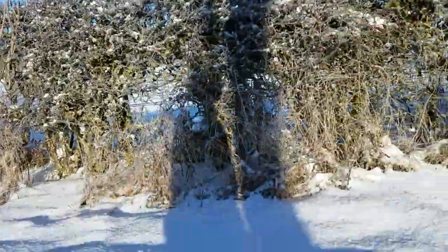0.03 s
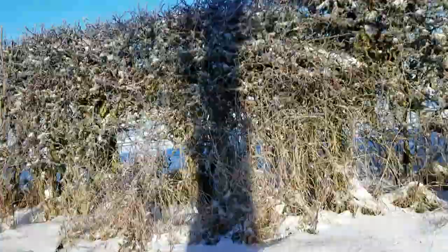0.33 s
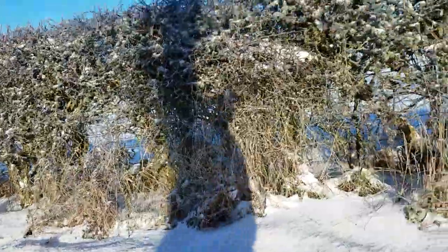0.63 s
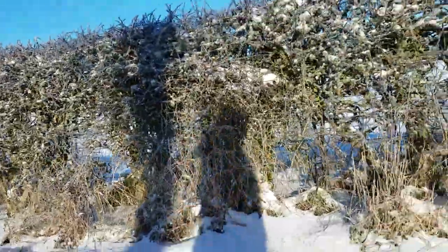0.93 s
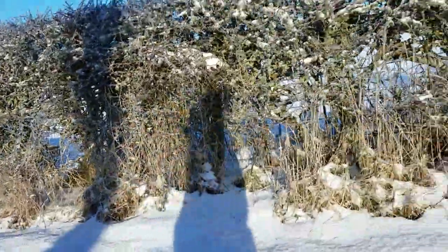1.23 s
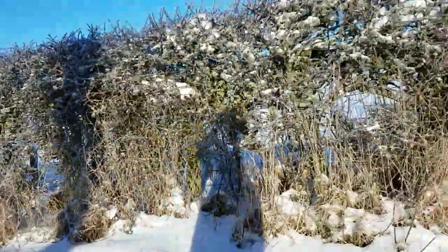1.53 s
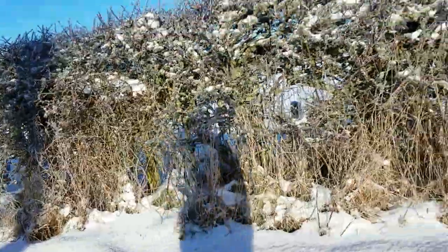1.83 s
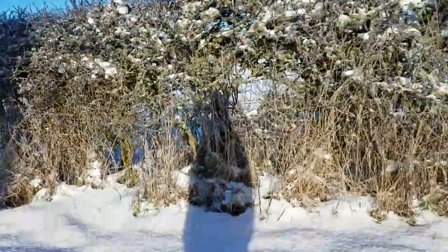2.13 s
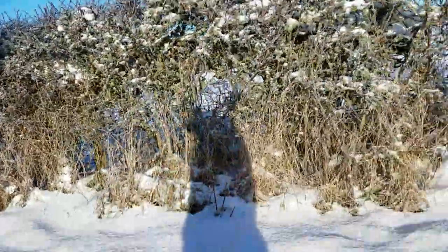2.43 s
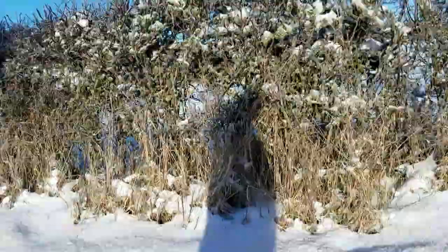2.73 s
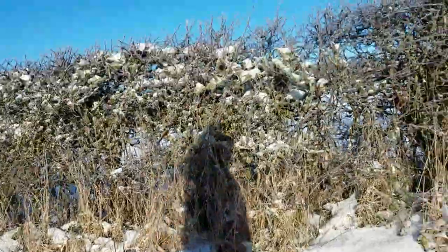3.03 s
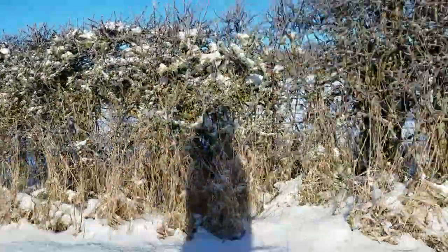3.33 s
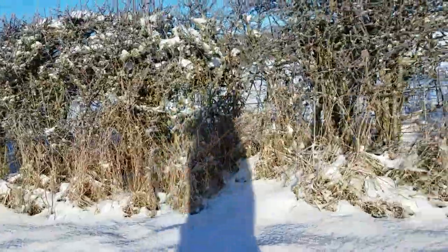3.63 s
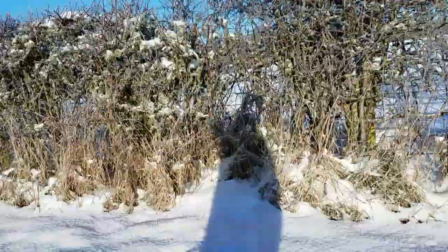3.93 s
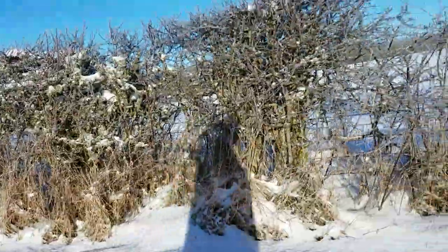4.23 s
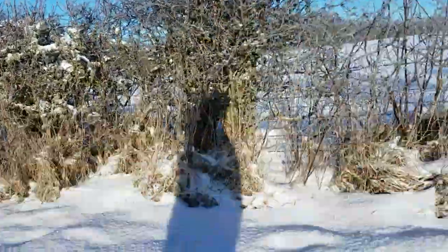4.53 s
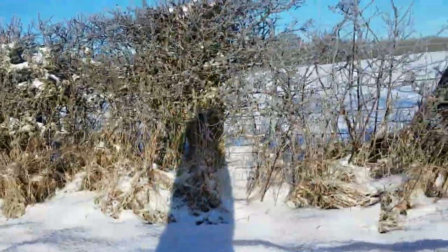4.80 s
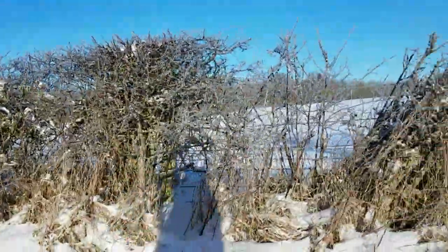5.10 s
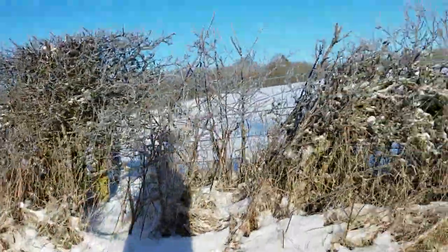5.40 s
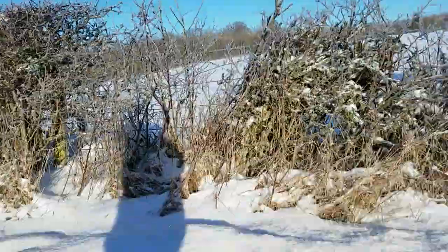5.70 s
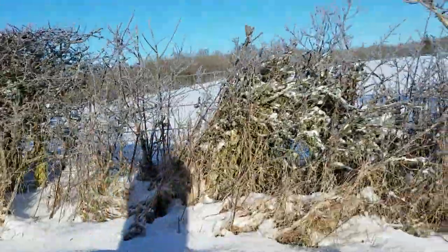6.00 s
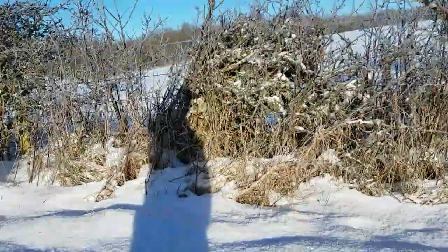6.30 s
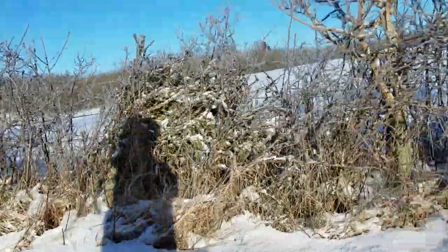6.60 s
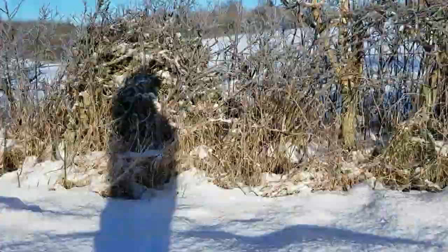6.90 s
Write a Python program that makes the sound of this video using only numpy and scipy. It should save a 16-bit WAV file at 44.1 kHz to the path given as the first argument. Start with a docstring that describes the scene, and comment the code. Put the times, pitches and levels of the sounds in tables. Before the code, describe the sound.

Steady crunching footsteps on packed snow outdoors, each followed by small brittle cracks, against very faint open-air noise.

```python
"""Footsteps in crusted snow

Someone walks at an even pace beside a hedge. Each boot crushes a dense shower of grains as it lands;
under its weight the packed snow gives way by brittle fracture, in separate cracks and crumbling slips.
The planted boot passes from ahead of two microphones to behind them, shifting the lag between them.
The hedge scatters a little sound back, over faint open-air noise, high hiss and light puffs of wind."""
import sys
import numpy as np
from scipy import signal
from scipy.fft import rfft, irfft
from scipy.io import wavfile
from scipy.ndimage import uniform_filter1d

SR = 44100
rng = np.random.default_rng(int(sys.argv[2]) if len(sys.argv) > 2 else 0)


def wav_out(sig):
    """Save sig, one row per channel (or a flat mono array), as 16-bit PCM at SR to the path in sys.argv[1]."""
    wavfile.write(sys.argv[1], SR, np.round(np.clip(np.atleast_2d(sig).T, -1, 1) * 32767).astype(np.int16))


N = 306495

# Spectral shapes of the voices of a footstep: frequency_hz, relative_db
THUD_SPECTRUM = [(40, -30), (100, -13), (200, -5), (350, 4.5), (560, 3.5), (820, -2), (1300, -33.5),
                 (3000, -61.5)]  # thud of the pack under the sole
SNAP_SPECTRUM = [(200, -51), (550, 7.5), (900, 2), (1400, 7.5), (2000, 6.5), (2800, -3.5), (3700, -13),
                 (5500, -30.5), (12000, -62.5)]  # snap of the crust
FIZZ_SPECTRUM = [(2000, -71), (4000, -5), (5500, -12.5), (7000, -6), (8200, -4.5), (9400, 6), (12000, 3),
                 (16000, -2.5)]  # high fizz of the crunch, as coloured by the microphones
THUD_HZ, SNAP_HZ = 440, 1560  # nominal pitches of the unshifted spectra
THUD_WIDTH_DB, CRUST_WIDTH_DB = 1.8, 2.5  # gain scatter per channel: long waves reach both more alike

# Steps: the rear boot rolls onto its toe, then the front boot lands, crushes the snow and settles.
# landing_s, attack_s, hold_s, release_s, crush_db, snap_relative_db, fizz_relative_db,
# roll_s, roll_db, roll_snap_relative_db, settle_db, slip_db
FOOTSTEPS = [(-.45, .03, .15, .03, -46, 0, -6, .1, -58, 0, -68, -53),
             (0.191, .03, .11, .04, -47, 0.5, -5, 0.17, -67, -1, -80, -56),
             (0.791, 0.032, 0.14, 0.024, -50, 4, -6, 0.27, -60, 1.5, -65, -55),
             (1.35, .02, 0.15, 0.021, -42.5, 1.5, -4.5, 0.019, -64, -15, -51.5, -47),
             (1.97, 0.022, 0.14, 0.0086, -46.5, 2.5, -3.5, 0.18, -70, 16, -64, -50),
             (2.555, 0.021, 0.13, 0.033, -43.5, -1, -13, 0.069, -55, 1, -59.5, -49.5),
             (3.161, 0.0089, .14, .015, -48, 3, -3.5, 0.065, -49.5, -2.5, -82, -47),
             (3.762, 0.031, 0.12, 0.043, -50, -1.5, -10, 0.6, -60, -2, -58.5, -55),
             (4.341, .025, 0.094, .03, -50, 1, -5.5, 0.18, -62.5, 5, -65.5, -53),
             (4.922, 0.0076, .115, 0.046, -48.5, 2.5, -3.5, 0.076, -69, -2, -60, -56.5),
             (5.519, .03, .13, .014, -45.5, -1.5, -9, .18, -53, 2, -60, -47.5),
             (6.13, 0.027, .075, .075, -51, 5, -3.5, 0.033, -63, -13, -51.5, -50.5),
             (6.776, 0.032, 0.044, 0.032, -43.5, 2.5, -9, 0.18, -58, 1, -56, -43)]
# Cracks of the crust: time_s, thud_db, snap_db, snap_hz, bite_db, fizz_db, crumble_ms
CRUST_CRACKS = [(0.052, -43.5, -55.5, 1802, -63, -55, 2.9), (0.092, -46, -49.5, 1830, -60, -54, 3.7),
                (0.1598, -42.5, -45, 1630, -49.5, -54, 3.9), (.237, -37.5, -44, 1590, -64, -57, 1.35),
                (0.2841, -31, -57, 1150, -50.5, -60, 0.67), (0.2953, -51, -34.5, 1360, -59, -47, 2.6),
                (0.3347, -31, -34.5, 1110, -53, -66, 2.58), (.462, -49, -48.5, 1430, -68, -71, 1.75),
                (0.4884, -35, -37.5, 1590, -42.5, -39, 2.9), (.546, -45, -39, 1560, -52, -53, 1.7),
                (0.5677, -47, -40.5, 1560, -69, -67, 1.76), (0.5904, -37.5, -39, 1490, -47.5, -50, 1.64),
                (.595, -33.5, -37, 1320, -70, -60, .5), (.632, -40.5, -42, 1400, -58, -65, 0.58),
                (.647, -44.5, -50, 1420, -60, -55, 1.1), (0.6668, -41, -40, 1480, -56, -55.5, 2.7),
                (0.705, -40.5, -45.5, 1820, -66, -56, 2.1), (0.7428, -37, -31.5, 1740, -36.5, -45.5, 1.8),
                (0.8065, -59, -39.5, 1980, -58, -67, 2), (0.8626, -47, -32.5, 2100, -42, -56, 1.18),
                (0.8831, -41, -40, 2040, -45, -51, 2.36), (0.9909, -43, -42.5, 1170, -57.5, -58, 1.3),
                (1.0623, -45, -49.5, 1317, -59, -63, 3.5), (1.1087, -53, -53.5, 1770, -55, -63, 4),
                (1.1813, -38, -46, 1410, -57.5, -73, 2.8), (1.2761, -44, -45.5, 1440, -54.5, -58, 5.1),
                (1.378, -34, -46, 1500, -71, -42, 4.63), (1.409, -32, -36, 1340, -48, -39, 1.45),
                (1.4345, -37, -35, 1741, -57, -44, 1.77), (1.4795, -35.5, -37, 1560, -71, -52, 0.73),
                (1.5022, -30, -34.5, 1370, -55, -43, 1.9), (1.508, -29, -26.5, 1700, -42, -40.5, 1.26),
                (1.5665, -40.5, -46.5, 1230, -70, -59, 1.7), (1.5855, -48, -43.5, 1580, -61, -51, 1.7),
                (1.6546, -52, -41, 1120, -67, -72, 2.1), (1.7041, -37.5, -38, 1390, -49, -50, 2.6),
                (1.755, -45, -45, 1427, -52, -57, 1.7), (1.8024, -23.5, -26.5, 1612, -33, -36.5, 1.31),
                (1.8081, -37, -36, 1140, -43, -47, 3.4), (1.8523, -41, -47, 1800, -48.5, -52, 3.1),
                (1.8811, -39, -44, 1730, -52, -52, 2.44), (1.9144, -43, -41, 1840, -45, -46, 2.56),
                (1.9578, -44, -34, 1690, -40, -57, 0.4), (1.9785, -41, -29.5, 1355, -38, -40, 2.75),
                (2.054, -46, -39, 1670, -52, -47, 2.45), (2.0867, -35.5, -38, 1240, -58, -64, 1.4),
                (2.1346, -34, -38, 1310, -47.5, -47, 1.93), (2.1416, -60, -50, 2052, -53, -38.5, 1.35),
                (2.2116, -43, -53, 1410, -60.5, -63, 2.4), (2.3221, -42.5, -48, 1269, -59, -69, 2.5),
                (2.396, -43, -49, 1456, -54, -54, 5.2), (2.4503, -44, -52, 1978, -49.5, -59, 1.9),
                (2.4854, -25.5, -31.5, 1015, -41, -46, 1.6), (2.557, -33, -41, 1670, -65, -43.5, 4),
                (2.569, -32, -41, 2110, -42, -41, 2.84), (2.599, -39, -37.5, 1890, -61, -39.5, 1.6),
                (2.6281, -33, -32.5, 940, -69, -66, 0.4), (2.635, -36, -39, 1396, -70, -63, 1.92),
                (2.662, -30, -32.5, 1550, -50, -47, 0.41), (2.709, -35, -38.5, 1560, -49, -65, 1.8),
                (2.7895, -40.5, -36.5, 1230, -57, -60, 1.1), (2.9077, -47, -47, 1318, -57, -67, 2.3),
                (2.9582, -49, -48.5, 1540, -69, -64, 3.27), (3.0688, -41.5, -37.5, 1722, -56, -55, 2.02),
                (3.089, -30, -34.5, 1438, -49, -50, 0.95), (3.1, -37.5, -37, 1754, -46, -61, 1.3),
                (3.165, -41, -45.5, 2030, -56, -37.5, 2.1), (3.202, -37.5, -37.5, 2330, -52, -58, 0.37),
                (3.228, -40.5, -45, 2150, -43.5, -46, 1.4), (3.253, -40, -38, 1486, -48, -48, 2.06),
                (3.2898, -42.5, -57, 1880, -47.5, -43.5, 2.46),
                (3.3027, -34.5, -34, 1440, -45.5, -56, 0.65), (3.475, -47, -51, 1290, -55.5, -58, 4.15),
                (3.527, -31, -32.5, 1280, -52.5, -52, 0.94), (3.5541, -43.5, -44, 1469, -54.5, -59, 0.67),
                (3.594, -49, -46, 1608, -52, -47.5, 3.8), (3.631, -38.5, -42.5, 1411, -50.5, -51.5, 2.75),
                (3.675, -44, -49, 1620, -58, -56, 1.64), (3.7256, -52, -49, 1806, -57, -69, 2.7),
                (3.7831, -40, -42, 1958, -48, -50, 5.24), (3.8329, -39.5, -43, 1749, -45.5, -57, 6.6),
                (3.8723, -33.5, -40.5, 1257, -61, -68, 1.94), (3.8873, -49, -40, 1467, -69, -74, 0.49),
                (4.096, -40.5, -27.5, 1990, -40, -67, 0.53), (4.1118, -41.5, -36.5, 1906, -53, -65, .98),
                (4.141, -48, -41, 1730, -67, -63, 1.2), (4.1844, -46, -48.5, 1940, -50.5, -55, 0.94),
                (4.2825, -39, -29.5, 1980, -32.5, -47.5, 1.33), (4.3063, -61, -40, 2140, -48, -54, 1.3),
                (4.3443, -39.5, -39, 1895, -44.5, -49, 2), (4.4047, -42, -39.5, 1370, -48, -65, 4.64),
                (4.4182, -48, -42, 1603, -64, -65, 2), (4.442, -44, -45, 1460, -47.5, -57, 2.3),
                (4.4875, -41, -40.5, 1430, -53.5, -62, 1.24), (4.5576, -46.5, -48, 1382, -56.5, -62, 5.6),
                (4.619, -46, -49, 1670, -57.5, -61, 2.61), (4.659, -44.5, -44.5, 1005, -59, -62, 2.44),
                (4.7022, -48.5, -49, 1232, -61, -72, 5.4), (4.7839, -44.5, -47.5, 1792, -54, -50, 4),
                (4.911, -46, -42, 1412, -60, -54, 2.7), (4.9248, -38, -37, 1902, -66, -40.5, 3.06),
                (4.935, -37, -37.5, 2090, -62, -46, 3.15), (4.982, -35, -36, 1890, -42.5, -48, 3.3),
                (5.0249, -60, -37.5, 1677, -50, -45, 5.14), (5.3235, -41.5, -37.5, 1560, -45.5, -51, 2.4),
                (5.3825, -42.5, -47, 1236, -55, -52.5, 2.3), (5.4794, -47, -30, 1960, -36.5, -55, 0.48),
                (5.5432, -34.5, -30.5, 1725, -39, -43, 1.9), (5.6029, -39.5, -41, 1717, -43, -41, 3.6),
                (5.6436, -44, -46, 1510, -51, -50, 3.7), (5.8239, -41.5, -50.5, 1437, -62, -69, 3.12),
                (5.8942, -42.5, -48.5, 1437, -65, -75, 2.1), (5.926, -42.5, -48.5, 1280, -64, -67, 6.6),
                (5.9826, -43.5, -51.5, 1707, -59, -63, 3.52),
                (6.0589, -39.5, -50.5, 1790, -58.5, -63, 2.76), (6.1039, -42.5, -55, 1356, -67, -59, 4.04),
                (6.1708, -47.5, -40.5, 1900, -40, -66, 1.45), (6.3113, -39, -41, 1877, -49, -44.5, 1.63),
                (6.4058, -45.5, -47.5, 1819, -49.5, -55, 2.76), (6.519, -44, -53, 1806, -54, -53.5, 2.9),
                (6.6753, -46, -47.5, 1519, -52.5, -56, 2.2), (6.7887, -33.5, -37, 1424, -51, -55, 1.4),
                (6.7967, -39, -36.5, 1307, -54, -52, 2.9), (6.806, -37, -34.5, 1520, -51, -61, 1.4),
                (6.823, -38.5, -38.5, 1440, -57, -63, 1.26), (6.8886, -40, -41, 1169, -54, -66, 1.18)]


def undb(db):
    """Amplitude ratio: a factor of ten for every 20 dB."""
    return 10 ** (np.asarray(db) / 20)


def rms(x):
    """Effective amplitude: the root of the mean square."""
    return np.sqrt(np.mean(x ** 2)) + 1e-12


def response(spectrum, pitch_ratio=1, size=1024):
    """Minimum phase: a causal impulse response of unit energy with the given spectrum, transposed."""
    hz, db = np.transpose(spectrum)
    bins_hz = np.maximum(np.arange(size // 2 + 1) * SR / size, 1)
    magnitude = undb(np.interp(np.log(bins_hz), np.log(hz * pitch_ratio), db))
    cepstrum = irfft(np.log(magnitude))
    cepstrum[1:size // 2] *= 2
    cepstrum[size // 2 + 1:] = 0
    ring = irfft(np.exp(rfft(cepstrum)))
    return ring / np.linalg.norm(ring)


def convolve(x, ring):
    """Linear filtering: each channel excites the impulse response, and keeps its length."""
    return signal.fftconvolve(x, np.atleast_2d(ring), axes=-1)[:, :x.shape[-1]]


def clicks(times, sizes, lag_ms, length, half_taps=4):
    """Fractional delay: a windowed sinc places stereo impulses between samples."""
    channels = []
    for side, size in zip((1, -1), np.broadcast_to(sizes, (2, len(times)))):
        arrival = (times + side * lag_ms / 2000)[:, None] * SR
        taps = np.floor(arrival).astype(int) + np.arange(1 - half_taps, half_taps + 1)
        weights = size[:, None] * np.sinc(taps - arrival) * np.sinc((taps - arrival) / half_taps)
        inside = (taps >= 0) & (taps < length)
        channels.append(np.bincount(taps[inside], weights[inside], length))
    return np.array(channels)


def open_air(floor_db=-65, coherent_hz=2500, wind_hz=80, wind_db=-73, lee_db=-8, gust_db=5, gust_s=0.11):
    """Spatial coherence: the noise floor is alike in both channels below the treble; wind is not."""
    # Faint outdoor noise and high hiss, as coloured by the microphones: frequency_hz, relative_db
    floor_spectrum = [(25, -22), (55, 0), (150, -3.5), (380, -1.5), (570, 4), (940, -4), (1650, -16),
                      (2700, -15), (5000, -20.5), (7500, -27), (9500, -26), (15500, -15)]
    mid, side = convolve(rng.standard_normal((2, N)), response(floor_spectrum, size=4096))
    side = signal.sosfilt(signal.butter(1, coherent_hz, "high", fs=SR, output="sos"), side)
    wind = signal.sosfilt(signal.butter(2, wind_hz, fs=SR, output="sos"), rng.standard_normal((2, N)))
    gusts = np.interp(np.arange(N) / SR / gust_s, np.arange(N), rng.uniform(-0.32, 1, N))
    ports_db = wind_db + gust_db * gusts + np.array([[0], [lee_db]])  # the right port is sheltered
    return undb(floor_db) * np.array([mid + side, mid - side]) + undb(ports_db) * wind / rms(wind)


def boot_lag(times, overlap_s=0.2, rear_share=0.44, scatter_ms=0.029):
    """Path difference: the left channel's lag in ms changes as the planted boot passes."""
    # Passage of a boot past the microphones: since_landing_s, left_lag_ms
    boot_path = [(0, 0.11), (.3, 0.072), (.52, -0.001), (.78, -0.07)]
    landings = np.array(FOOTSTEPS)[:, 0]
    step = np.maximum(np.searchsorted(landings, times) - 1, 0)
    # just after a landing the rear boot is still pushing off
    from_rear = (times - landings[step] < overlap_s) & (rng.random(len(times)) < rear_share)
    age_s = times - landings[np.maximum(step - from_rear, 0)]
    return np.interp(age_s, *np.transpose(boot_path)) + scatter_ms * rng.standard_normal(len(times))


def grain_sizes(count, spread_db):
    """Capped power law: many small grains and a few large ones, of either sign."""
    return rng.choice([-1, 1], count) * undb(spread_db * np.minimum(rng.exponential(size=count), 5))


def press(t, start_s, attack_s, hold_s, release_s):
    """Load envelope: weight comes onto the snow, holds and lifts, with Gaussian edges."""
    rise = np.maximum(start_s - t, 0) / attack_s
    fall = np.maximum(t - start_s - hold_s, 0) / release_s
    return np.exp(-rise ** 2 - fall ** 2)


def tread(t, rest_db=-79, settle_s=0.28, roll_edge_s=0.034, scrape_edge_s=0.0032):
    """Incoherent sources add in power: roll, crush, settling and scrapes set thud, snap, fizz in dB."""
    # A sole scraping over the crust: start_s, length_s, thud_db, snap_relative_db, fizz_relative_db
    sole_scrapes = [(.095, 0.017, -47, -2.5, -8), (1.543, 0.083, -58, 5, -11), (2.362, 0.021, -59, 9, -23),
                    (2.814, 0.029, -58.5, 3.5, -10), (3.405, 0.038, -60, 4.5, 5.5),
                    (3.99, .07, -69, 14, -16), (4.845, 0.041, -52.5, 3, -8.5), (6.707, 0.034, -57.5, 6, 3)]

    def colour(snap_db, fizz_db):
        """Power ratios of thud, snap and fizz to the thud."""
        return undb(np.broadcast_arrays(np.zeros(len(t)), snap_db, fizz_db)) ** 2

    light_snap_db, light_fizz_db = -2, -8.5  # lightly loaded snow
    light = colour(light_snap_db, light_fizz_db)
    power = light * undb(rest_db) ** 2
    for (landing_s, attack_s, hold_s, release_s, crush_db, snap_db, fizz_db,
         roll_s, roll_db, roll_snap_db, settle_db, _) in FOOTSTEPS:
        roll = press(t, landing_s - roll_s, roll_edge_s, roll_s, roll_edge_s) * undb(roll_db)
        crush = press(t, landing_s, attack_s, hold_s, release_s) * undb(crush_db)
        after_crush_s = np.maximum(t - landing_s - hold_s, 0)
        settle = (t > landing_s) * np.exp(-after_crush_s / settle_s) * undb(settle_db)
        # over a crush the fizz falls 2.5 dB, with an arch of 1 dB
        stage = np.clip((t - landing_s) / hold_s - .5, -.5, .5)
        fade_db = 2.5 * stage + .5 - np.cos(np.pi * stage)
        power += colour(roll_snap_db, light_fizz_db) * roll ** 2
        power += colour(snap_db, fizz_db - fade_db) * crush ** 2
        power += light * settle ** 2
    for start_s, length_s, thud_db, snap_db, fizz_db in sole_scrapes:
        scrape = press(t, start_s, scrape_edge_s, length_s, scrape_edge_s) * undb(thud_db)
        power += colour(snap_db, fizz_db) * scrape ** 2
    return 10 * np.log10(power)


def crunch(grains_per_s=2600, colour_db=2.0, pitch_ratio=1.32, smoothing_s=0.0286):
    """Shot noise: grains break at random times, in a shower whose level follows the tread."""
    # Fine powder rubbing under the sole: frequency_hz, relative_db
    rasp_spectrum = [(300, -13), (900, -4), (1900, 2), (2600, -5), (3300, -4), (4000, -14), (5200, -11),
                     (7500, -18), (12000, -28)]
    count = int(grains_per_s * N / SR)
    times = rng.uniform(0, N / SR, count)
    grains = grain_sizes(count, spread_db=7)
    lag_ms = boot_lag(times)
    even_grains = np.sign(grains) * np.sqrt(np.abs(grains))  # rasp and fizz vary less between grains
    t = np.arange(0, N / SR, .001)
    thud_db, snap_db, fizz_db = (np.interp(np.arange(N) / SR, t, curve) for curve in tread(t))
    pitches = pitch_ratio ** np.linspace(-1, 1, 3)
    voices = ((THUD_SPECTRUM, pitches, grains, thud_db, THUD_WIDTH_DB),
              (SNAP_SPECTRUM, pitches, grains, snap_db - 4.5, CRUST_WIDTH_DB),
              (rasp_spectrum, [1], even_grains, snap_db - 5, CRUST_WIDTH_DB),
              (FIZZ_SPECTRUM, [1], even_grains, fizz_db, CRUST_WIDTH_DB))
    out = 0
    for spectrum, shifts, sizes, level_db, width_db in voices:
        scatter_db = colour_db * rng.standard_normal(count) + width_db * rng.standard_normal((2, count))
        strengths = sizes * undb(scatter_db)
        shower = 0
        for k, shift in enumerate(shifts):
            group = np.arange(count) % len(shifts) == k
            impulses = clicks(times[group], strengths[:, group], lag_ms[group], N)
            shower += convolve(impulses, response(spectrum, shift))
        # the boot does a set amount of work: a large grain takes it from its neighbours
        power = uniform_filter1d(np.mean(shower ** 2, axis=0), int(smoothing_s * SR))
        out += shower * undb(level_db) / np.sqrt(np.abs(power) + 1e-12)
    return out


def fracture(thud_db, snap_db, snap_hz, bite_db, fizz_db, crumble_ms, lag_ms, size,
             clean_ms=1.51, usual_crumble_ms=1.95, scatter_ms=0.012, level_window_s=.01, count=64):
    """Brittle fracture: one main break amid an avalanche, standing out less the longer it crumbles."""
    # Bite of the crust's hard edge: frequency_hz, relative_db
    bite_spectrum = [(1200, -7), (2400, 9), (3100, 10.5), (3900, 2.5), (4900, 4.5), (6000, -5.5),
                     (7500, -13), (12000, -16)]
    thud_hz = THUD_HZ * (usual_crumble_ms / max(crumble_ms, 1)) ** 0.19  # longer crumbling thuds lower
    thud_hz *= (SNAP_HZ / snap_hz) ** 0.49  # a lower snap goes with a higher thud
    stage = np.r_[0, rng.uniform(-3, 3, count - 1)]  # the main break is at 0
    skew = np.where(stage < 0, 0.857, 1)  # the avalanche builds faster than it trails off
    offsets_ms = (1.122 + 0.428 * crumble_ms) * stage * skew
    times = size / 4 / SR + offsets_ms / 1000
    lags_ms = lag_ms + scatter_ms * rng.standard_normal(count)
    main_break = (clean_ms / max(crumble_ms, .5)) ** 1.93
    grains = grain_sizes(count, spread_db=3.5) / (1 + stage ** 2)
    sizes = np.r_[main_break, grains[1:] / np.linalg.norm(grains[1:])]
    voices = ((THUD_SPECTRUM, thud_hz / THUD_HZ, thud_db, THUD_WIDTH_DB),
              (SNAP_SPECTRUM, snap_hz / SNAP_HZ, snap_db, CRUST_WIDTH_DB),
              (bite_spectrum, 1, bite_db, CRUST_WIDTH_DB),
              (FIZZ_SPECTRUM, 1, fizz_db, CRUST_WIDTH_DB))
    out = 0
    for spectrum, shift, level_db, width_db in voices:
        strengths = sizes * undb(width_db * rng.standard_normal((2, count)))
        burst = convolve(clicks(times, strengths, lags_ms, size), response(spectrum, shift))
        out += burst * undb(level_db) / rms(burst) * np.sqrt(level_window_s * SR / size)
    return out


def cracks(rows, size=2048):
    """Superposition: one fracture for each row, heard from where its boot stands."""
    out = np.zeros((2, N + 2 * size))
    lags_ms = boot_lag(np.array(rows)[:, 0])
    for (time_s, *timbre), lag_ms in zip(rows, lags_ms):
        start = int(time_s * SR) + size - size // 4
        out[:, start:start + size] += fracture(*timbre, lag_ms, size)
    return out[:, size:size + N]


def slips(stance_per_s=28, crush_per_s=70, stance_ms=2.88, crush_ms=1.91,
          relief_s=.013, pause_s=0.15, pause_db=-6, colour_db=2.5, max_slips=400):
    """Stick-slip: small fractures of the pack come faster, louder and shorter as the crush grows."""
    t = np.arange(0, N / SR, .001)
    landing_s, attack_s, hold_s, release_s, crush_db, *_, slip_db = np.transpose(FOOTSTEPS)
    load = sum(press(t, *timing) for timing in zip(landing_s, attack_s, hold_s, release_s))
    crushing = np.minimum(load, 1)
    slips_due = np.cumsum(stance_per_s + (crush_per_s - stance_per_s) * crushing) * t[1]
    crack_times = np.array(CRUST_CRACKS)[:, 0]
    rows = []
    for k, (late, snap, bite, fizz, pitch, crumble) in enumerate(rng.standard_normal((max_slips, 6))):
        i = np.searchsorted(slips_due, k + .3 * late)
        if i == len(t) or np.abs(crack_times - t[i]).min() < relief_s:  # a crack takes the load off
            continue
        step = np.searchsorted(landing_s, t[i]) - 1
        # slips are weak just after a crush, until the load builds again
        stance_db = slip_db[step] + pause_db * (t[i] < landing_s[step] + hold_s[step] + pause_s)
        thud_db = stance_db + (crush_db[step] + 2 - stance_db) * crushing[i]
        snap_db = thud_db - 4 + colour_db * snap
        bite_db = thud_db - 16 + colour_db * bite
        fizz_db = thud_db - 15.5 + colour_db * fizz
        snap_hz = SNAP_HZ * np.exp(0.31 * pitch)
        crumble_ms = (stance_ms + (crush_ms - stance_ms) * crushing[i]) * np.exp(0.36 * crumble)
        rows.append((t[i], thud_db, snap_db, snap_hz, bite_db, fizz_db, crumble_ms))
    return cracks(rows)


def hedge(x, wet_db=-28, t60_s=0.37, delay_s=0.0082, top_hz=1800):
    """Diffuse scattering: twigs throw back a faint, dull, exponentially decaying tail."""
    t = np.arange(SR // 3) / SR
    tail = rng.standard_normal((2, len(t))) * np.exp(-np.log(1000) * t / t60_s) * (t > delay_s)
    tail = signal.sosfilt(signal.butter(1, top_hz, fs=SR, output="sos"), tail)
    return undb(wet_db) * convolve(x, tail / np.linalg.norm(tail[0]))


def scene(left_over_right_db=1.5):
    """Sound pressures add: boots, their echo and the open air, a little louder on the left."""
    outdoors = open_air()
    boots = crunch() + cracks(CRUST_CRACKS) + slips()
    balance = undb(np.array([[.5], [-.5]]) * left_over_right_db)
    return (boots + hedge(boots) + outdoors) * balance


def record(dry, top_hz=16000):
    """Band limiting: a steep low-pass filter cuts the highest treble."""
    return signal.sosfilt(signal.ellip(8, .2, 70, top_hz, fs=SR, output="sos"), dry)


dry = scene()
out = record(dry)
wav_out(out)
```